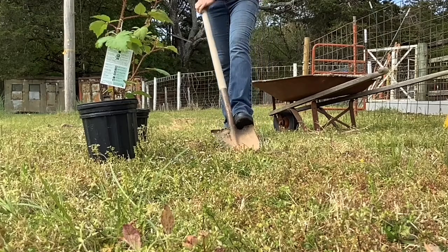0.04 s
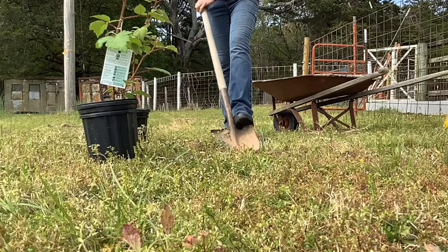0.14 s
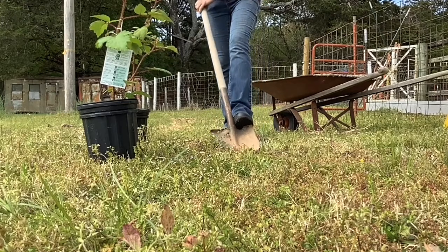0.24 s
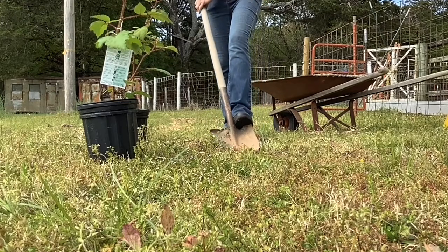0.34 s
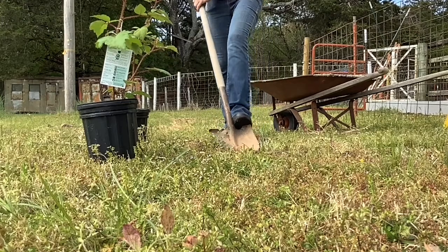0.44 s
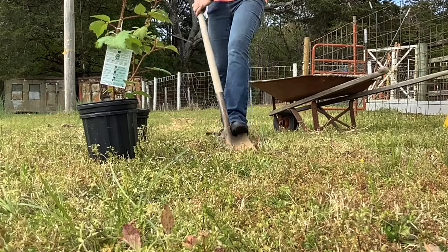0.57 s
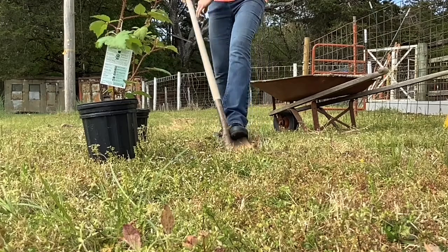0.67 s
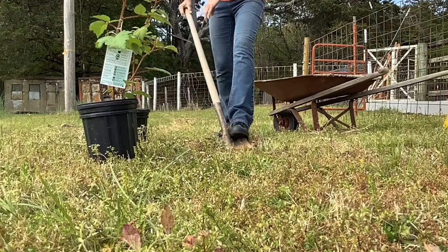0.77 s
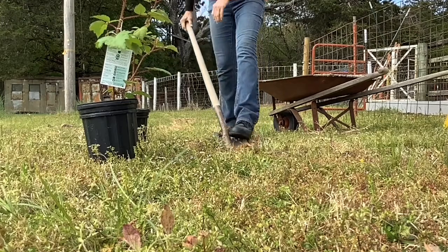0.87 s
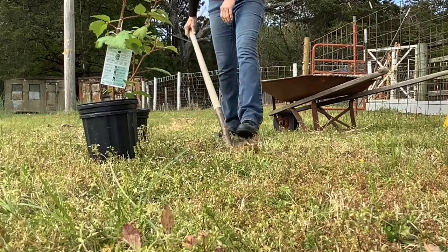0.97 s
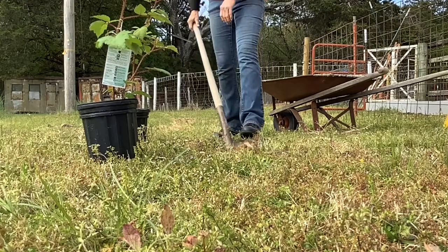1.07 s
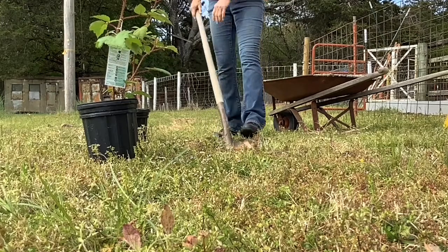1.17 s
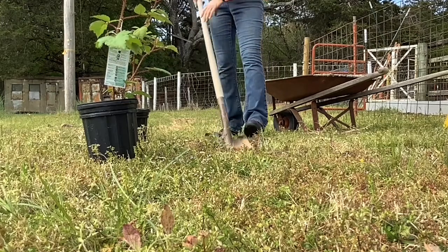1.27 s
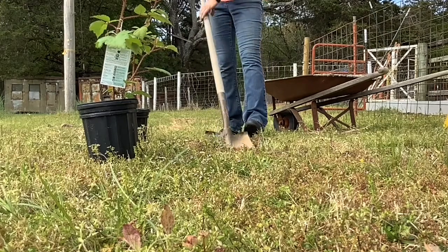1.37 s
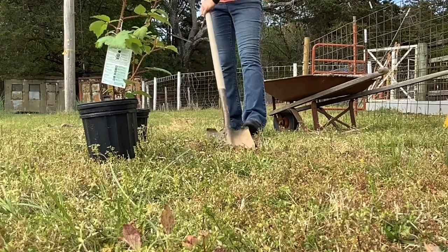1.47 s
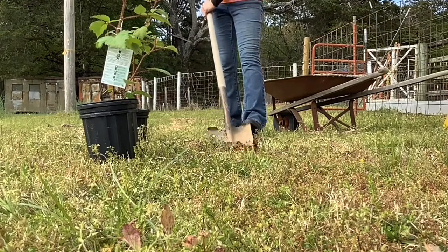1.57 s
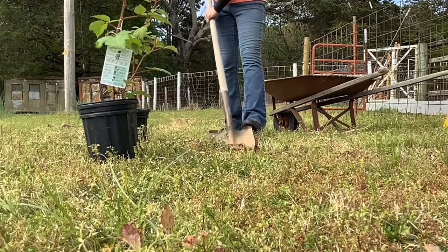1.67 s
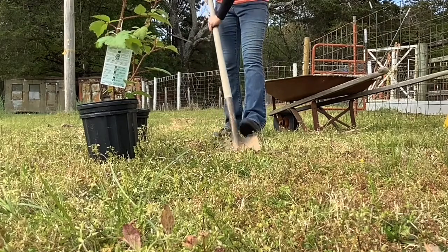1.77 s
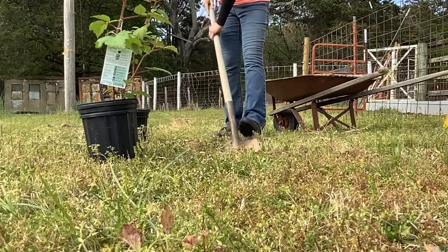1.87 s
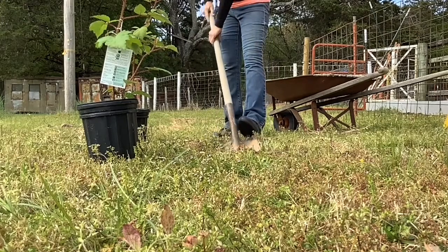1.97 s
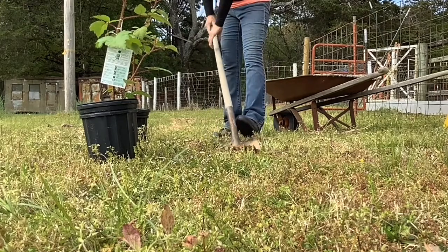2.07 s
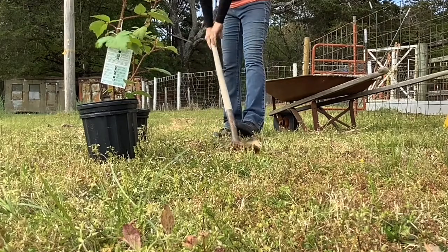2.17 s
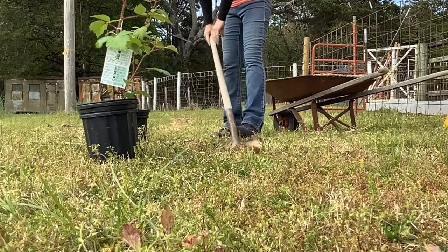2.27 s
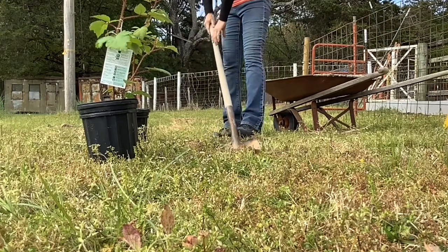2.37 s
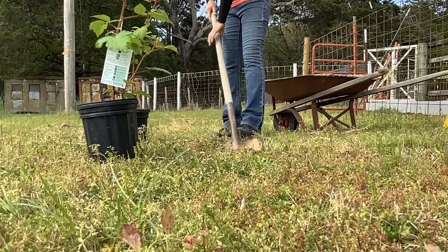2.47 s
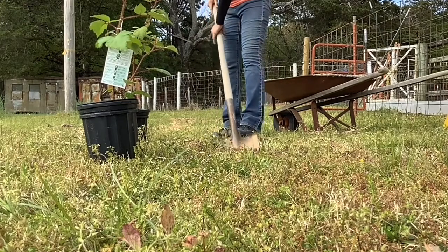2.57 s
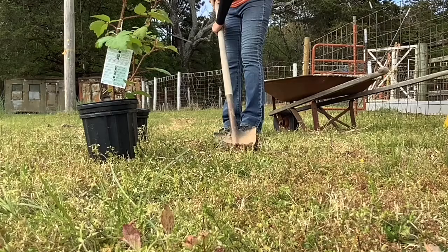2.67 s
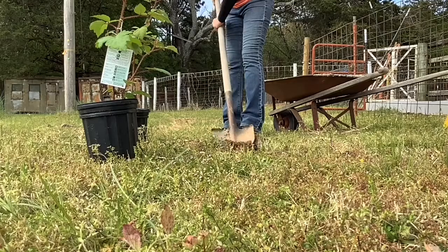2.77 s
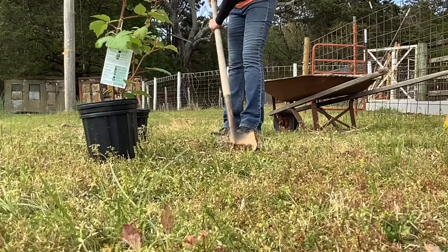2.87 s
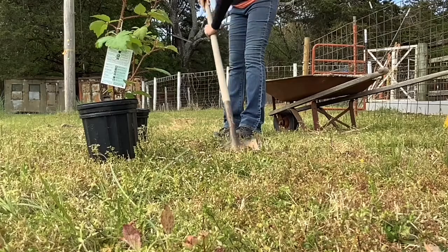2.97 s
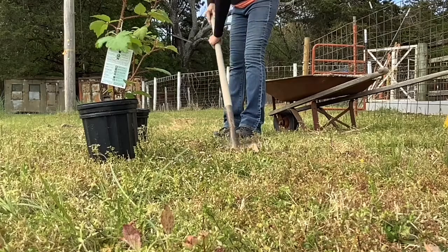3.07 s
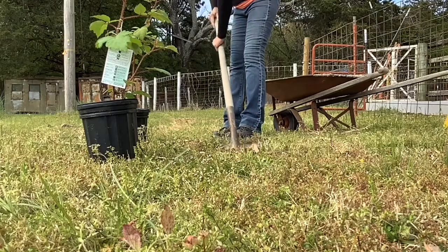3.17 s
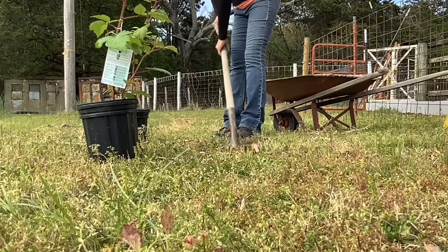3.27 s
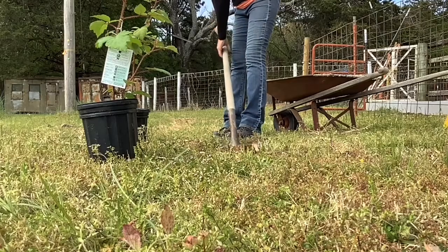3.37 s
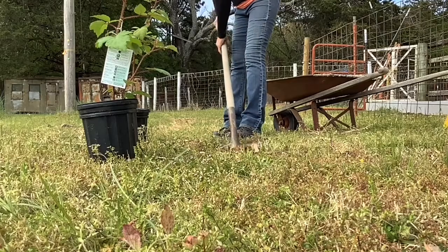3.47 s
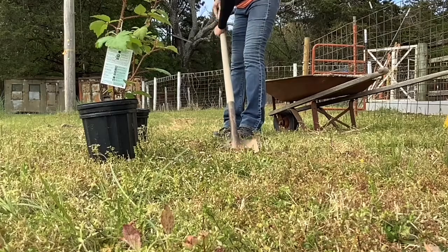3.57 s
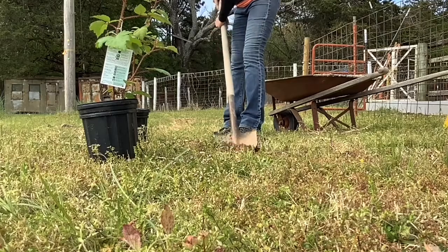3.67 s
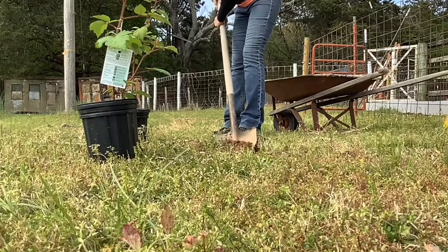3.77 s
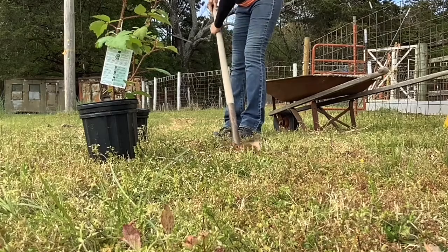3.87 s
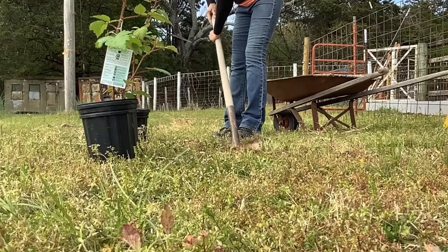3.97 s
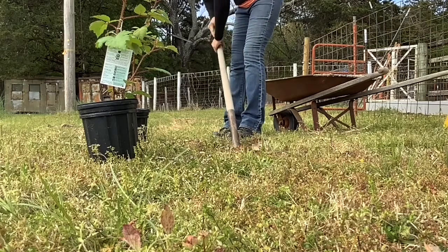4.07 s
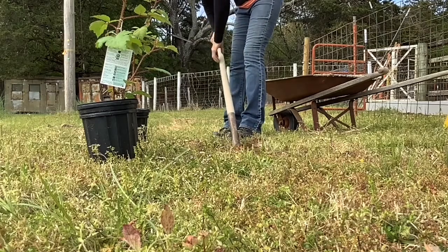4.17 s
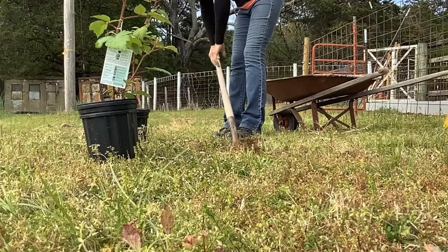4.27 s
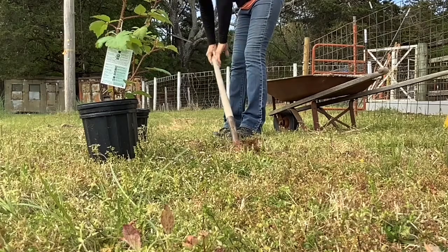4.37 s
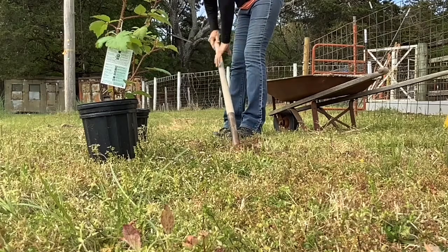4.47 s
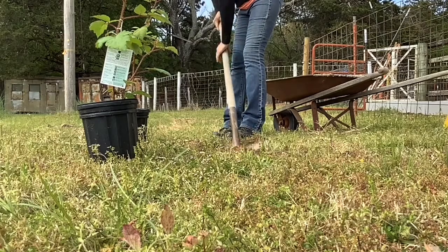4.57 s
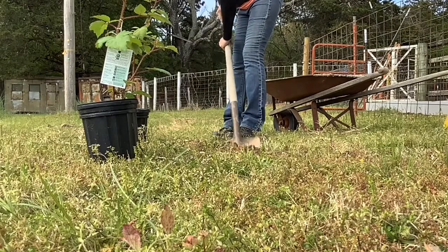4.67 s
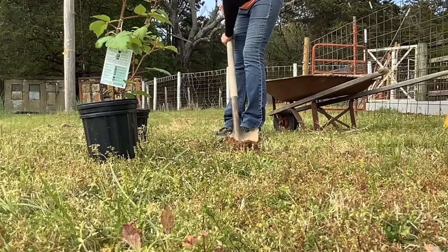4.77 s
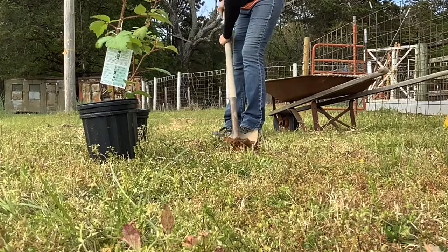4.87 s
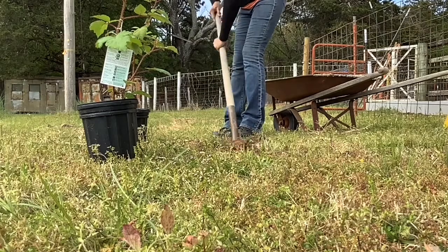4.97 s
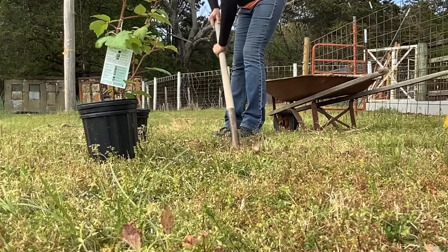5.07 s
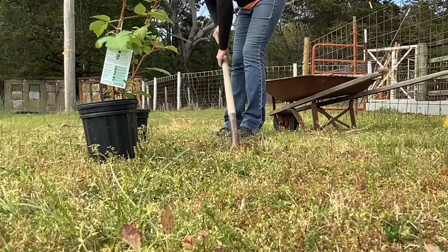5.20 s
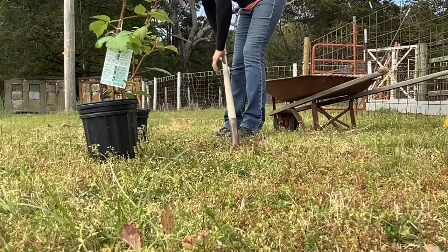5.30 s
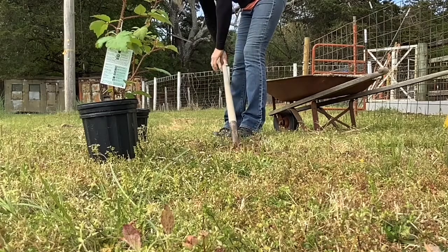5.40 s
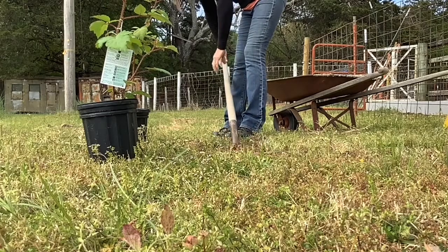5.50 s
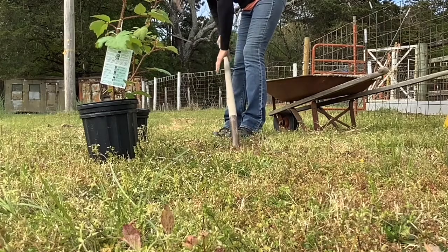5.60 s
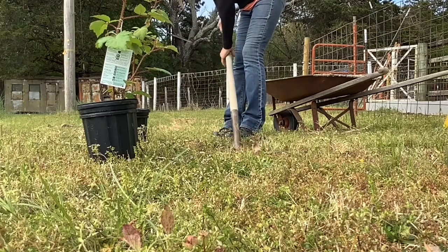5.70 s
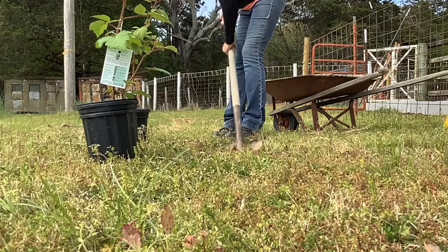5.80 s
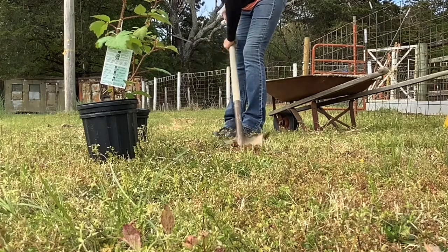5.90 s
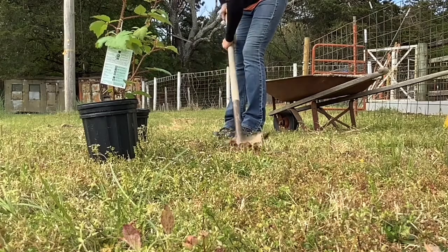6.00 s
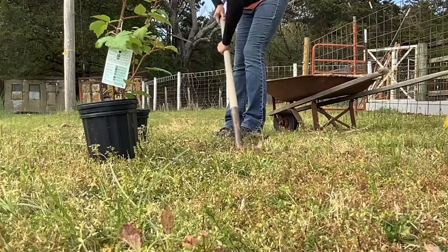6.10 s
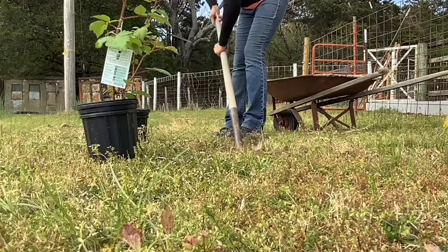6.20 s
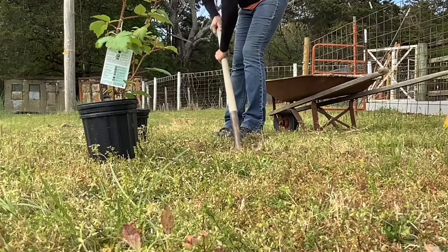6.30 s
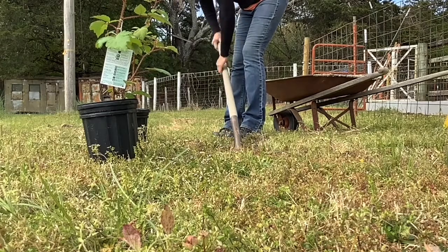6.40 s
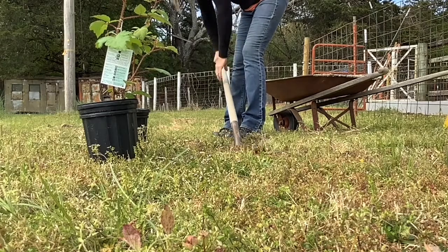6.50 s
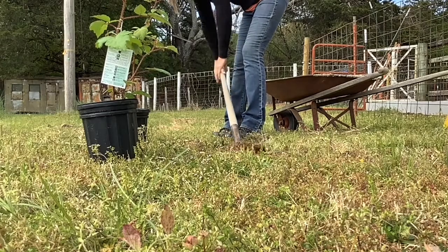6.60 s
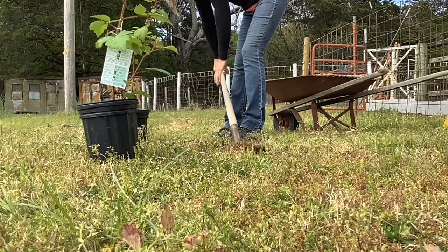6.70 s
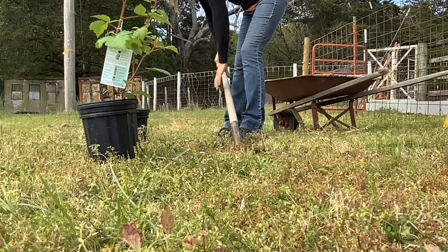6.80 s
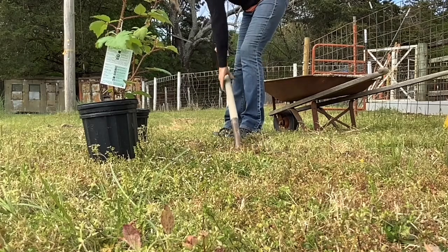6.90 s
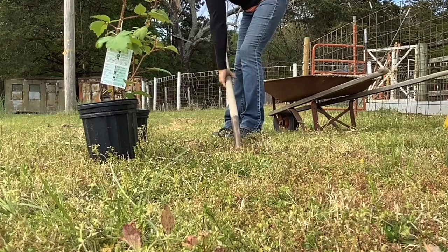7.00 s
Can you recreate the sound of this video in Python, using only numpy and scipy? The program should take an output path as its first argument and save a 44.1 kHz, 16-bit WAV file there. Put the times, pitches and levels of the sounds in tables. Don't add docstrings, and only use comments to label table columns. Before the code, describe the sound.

Close at ground level in an open yard, a shovel is driven into hard clay about once a second. A light, scratchy push comes first, then hard gritty clanks with low soil thuds, grass hiss and flying chips. Soft scrapes and small knocks fill the gaps. Later stabs are a little weaker. Far behind lie low traffic rumble, a droning engine, faint insects and one weak bird whistle.

```python
import sys
import numpy as np
from scipy import signal
from scipy.fft import rfft, irfft
from scipy.io import wavfile
from scipy.ndimage import map_coordinates

SR = 44100
rng = np.random.default_rng(int(sys.argv[2]) if len(sys.argv) > 2 else 0)


def waveform_to_disk(signal):
    frames = np.transpose(np.atleast_2d(signal))
    scaled = np.clip(frames, -1, 1) * 32767
    samples = np.round(scaled).astype(np.int16)
    wavfile.write(sys.argv[1], SR, samples)


def nominal_scale(level):
    x = np.asarray(level, float) / 20
    return 10 ** x


N = 310905
T = np.arange(N) / SR

# mode_hz, width_hz, level_db
UPPER_MODES = [(835, 240, -0.5), (1002, 170, 3), (1237, 200, 2), (1776, 160, 3), (2242, 100, -7.5),
               (2540, 120, -8.5), (3130, 330, -24), (4000, 970, -27)]


def rms_one(x):
    return x / np.sqrt(np.mean(x ** 2) + 1e-30)


def in_time(rows):
    s, *columns = np.transpose(rows)
    return [np.interp(T, s, c, -200, -200) for c in columns]


def butter(x, hz, kind, order=2):
    return signal.sosfilt(signal.butter(order, hz, kind, fs=SR, output="sos"), x)


def resonate(x, hz, width_hz):
    r = np.exp(-np.pi * width_hz / SR)
    top = [(1 - r * r) / 2, 0, (r * r - 1) / 2]
    return signal.lfilter(top, [1, -2 * r * np.cos(2 * np.pi * hz / SR), r * r], x)


def body(x, modes, grip=None):
    grip = np.ones(len(modes)) if grip is None else grip
    out = 0
    for k, (hz, width_hz, db) in enumerate(modes):
        out = out + (-1) ** k * nominal_scale(db) * resonate(x * grip[k], hz, width_hz)
    return out


def drift(rate_hz):
    knots = rng.standard_normal(int(N / SR * rate_hz) + 3)
    coarse = map_coordinates(knots, [T[::16] * rate_hz], order=3)
    return np.interp(T, T[::16], coarse)


def coloured(spectrum, white):
    hz, db = np.transpose(spectrum)
    bins_hz = np.maximum(np.arange(N // 2 + 1) * SR / N, 1)
    gain = nominal_scale(np.interp(np.log(bins_hz), np.log(hz), db))
    return rms_one(irfft(rfft(white) * gain, N))


def narrow(hz, width_hz):
    once = resonate(rng.standard_normal(N), hz, width_hz)
    return rms_one(resonate(once, hz, width_hz))


def grit(per_s, spread_db):
    sizes = nominal_scale(spread_db * np.minimum(rng.exponential(1, N), 4)) * rng.choice([-1, 1], N)
    return rms_one(sizes * (rng.random(N) < per_s / SR)) + 1e-9


def burst(rows, fall=0.6):
    power = np.zeros(N + SR)
    ms = 1000 * np.arange(-SR // 50, SR // 50) / SR
    for s, db, hz, length_ms, *_ in rows:
        i = round(s * SR) - SR // 50
        half_ms = length_ms * np.where(ms > 0, fall, 1 - fall)
        power[i:i + len(ms)] += (nominal_scale(db) * 2 ** -(ms / half_ms) ** 2) ** 2
    power = power[:N]

    def since_silence(v):
        return v - np.maximum.accumulate(v * (power == 0))

    s, hz = np.transpose(sorted((row[0], row[2]) for row in rows))
    phase = 2 * np.pi * np.cumsum(np.interp(T, s, hz)) / SR
    return np.sqrt(power), since_silence(phase), since_silence(T)


def pings(rows):
    out = np.zeros(N)
    ms = 1000 * np.arange(-SR // 25, SR // 25) / SR
    for s, db, hz, length_ms in rows:
        i = round(s * SR) - SR // 25
        swell = nominal_scale(db) * 2 ** -(2 * ms / length_ms) ** 2
        out[i:i + len(ms)] += swell * np.sin(2 * np.pi * hz * ms / 1000)
    return out


def open_air():
    # band_hz, density_db_per_hz
    air_spectrum = [(18, -34), (30, -18.5), (64, 5), (92, 6), (160, -10.5), (284, -16), (505, -11),
                    (606, -21.5), (921, -42.5), (3320, -40), (4310, -37), (5170, -40), (15500, -42)]
    return nominal_scale(-62.5 + 1.0 * drift(4.3)) * coloured(air_spectrum, rng.standard_normal(N))


def traffic():
    # time_s, level_db
    rumble_level = [(0, -64.5), (.3, -59), (.7, -57), (1.08, -64), (1.4, -68), (1.55, -57), (1.8, -49),
                    (2.04, -66), (2.3, -62.5), (2.77, -61), (4.16, -60.5), (4.55, -57), (5.0, -57.5),
                    (5.25, -59.5), (6.87, -59.5), (7.05, -60.5)]
    rumble = rms_one(butter(butter(rng.standard_normal(N), 52, "high", order=4), 130, "low"))
    return rumble * nominal_scale(in_time(rumble_level)[0] - 2.5 + 2.0 * drift(6))


def wavering_line(hz, db):
    level = np.sqrt(2) * nominal_scale(db + 2.0 * drift(12))
    return level * np.sin(2 * np.pi * np.cumsum(hz * (1 + 0.012 * drift(8))) / SR)


def engines():
    # time_s, main_line_db, speed relative to cruising
    approach = [(0, -71, 1.1), (1, -78.5, 1.12), (2.2, -72, 1.1), (2.7, -60, 0.94), (3.15, -56.5, 1.035),
                (3.7, -64.5, 1.07), (4.4, -56.5, 1.01), (5, -63, .99), (5.25, -51.5, 0.98),
                (6.2, -52, 1.01), (7.05, -51, 0.99)]
    # line_hz, level_db at middle distance, swell_share
    engine_lines = [(56.5, -70.5, .4), (90.4, -62, 1), (177.3, -74, 0.59)]
    # time_s, level_db
    motor_level = [(0, -68), (1.45, -75.5), (1.6, -61.5), (1.85, -73), (2.25, -78), (2.35, -65),
                   (2.9, -58.5), (3.2, -71.5), (4.4, -76), (5, -67), (6.2, -59.5), (7.05, -64)]
    main_db, speed = in_time(approach)
    middle_db = -60
    out = wavering_line(143, in_time(motor_level)[0])
    for hz, db, share in engine_lines:
        out = out + wavering_line(hz * speed, db + share * (main_db - middle_db))
    return out


def insects():
    # centre_hz, width_hz, level_db
    insect_bands = [(4290, 330, -92), (4620, 420, -95.5), (8560, 1100, -96.5)]
    return sum(nominal_scale(db + 1.4 * drift(2.2)) * narrow(hz, width_hz) for hz, width_hz, db in insect_bands)


def bird():
    # time_s, pitch_hz, level_db
    whistle = [(4.28, 3940, -92.5), (4.297, 3920, -81), (4.345, 3680, -78), (4.385, 4010, -82.5),
               (4.455, 3950, -76.5), (4.475, 4110, -87), (4.515, 4170, -74), (4.6, 4250, -78),
               (4.67, 4260, -82), (4.72, 4280, -95)]
    # peak_s, peak_db, pitch_hz, length_ms
    cheeps = [
        (1.559, -81, 5840, 14),
        (4.352, -86, 5350, 12),
        (4.5, -83, 5480, 14),
        (4.52, -74, 3640, 55),
        (4.525, -82, 5500, 14),
    ]
    hz, db = in_time(whistle)
    blur = rms_one(butter(rng.standard_normal(N), 140, "low")) * nominal_scale(1.2 * drift(28))
    return blur * (nominal_scale(db) * np.sin(2 * np.pi * np.cumsum(hz) / SR) + pings(cheeps))


def background():
    return open_air() + traffic() + engines() + insects() + bird()


def thuds():
    # arrival_s, peak_db, centre_hz
    ground_waves = [(0.552, -54, 200), (1.527, -43, 152), (1.612, -55, 169.6), (1.66, -54.5, 130),
                    (1.769, -35, 136), (1.82, -39, 74), (1.889, -35.5, 255), (2.948, -39.5, 134.4),
                    (2.988, -41, 71.9), (3.892, -30, 180), (3.913, -41, 72.4), (4.99, -39, 172),
                    (6.152, -35, 157)]
    out = np.zeros(N + SR)
    for s, db, hz in ground_waves:
        i = round(s * SR)
        cycles = T[:SR // 4] * hz
        wave = np.sin(2 * np.pi * cycles / (1 + 0.14 * cycles))
        out[i:i + len(cycles)] += nominal_scale(db + 11.5) * cycles * np.exp(-cycles / 0.59) * wave
    return out[:N]


def ticks():
    # start_s, level_db, centre_hz, length_s
    stems = [(.41, -67.5, 11500, .012), (0.505, -59, 13000, 0.045), (0.602, -63, 12000, 0.035),
             (0.681, -62.5, 12500, 0.027), (1.755, -52, 12000, .008), (1.885, -62, 3000, 0.0046),
             (1.886, -64, 11500, .003), (2.921, -56, 12980, .012), (3.46, -72, 7150, 0.036),
             (3.857, -58, 13000, .01), (4.108, -73, 5960, 0.036), (5.215, -73, 6040, 0.018),
             (5.699, -65, 5500, .02), (5.715, -65, 9000, .02), (5.902, -72, 12000, .003),
             (6.253, -71, 9000, 0.0024)]
    # peak_s, peak_db, centre_hz
    chips = [(0.5249, -46, 13420), (0.5357, -51.0, 13320), (0.545, -50, 12980), (0.5495, -44, 13770),
             (0.556, -54, 5230), (1.7378, -61, 4220), (1.7464, -43, 13180), (1.751, -62, 4290),
             (1.7596, -38.5, 4200), (1.7657, -44.5, 4570), (2.911, -53.5, 4590), (2.9177, -61, 5320),
             (2.9256, -45, 12770), (2.9313, -37.5, 4640), (2.9393, -52, 4370), (3.8504, -52.5, 5420),
             (3.859, -47.5, 9500), (3.862, -47, 4770), (3.8685, -45, 4740), (3.8725, -49, 4620),
             (4.9385, -39, 4200), (4.958, -37.5, 3700), (4.9662, -40, 5960), (6.0526, -50, 4520),
             (6.0652, -54, 6150), (6.0779, -48, 9820), (6.09, -45, 12270), (6.1015, -54, 4750),
             (6.121, -60, 6220), (6.1254, -50, 4590)]
    chip_s = 0.002
    rows = stems + [(s - chip_s / 2, db + 2.0, hz, chip_s) for s, db, hz in chips]
    out = np.zeros(N + SR)
    for s, db, hz, length_s in rows:
        i = round(s * SR)
        u = T[:SR // 4] / length_s
        noise = resonate(rng.standard_normal(SR // 4), hz, hz * 0.48)
        noise = rms_one(resonate(noise, hz, hz * 0.66))
        out[i:i + len(u)] += nominal_scale(db + 7.5) * u * np.exp(-2 * u) * noise
    return out[:N]


def grass():
    # band_hz, density_db_per_hz
    hiss_spectrum = [(1650, -28.5), (2800, -4.5), (3250, -3.5), (3500, -1.5), (3840, -10), (4270, 1),
                     (4930, -5.5), (5330, -4.5), (6290, -6.5), (6800, -12.5), (8200, -12), (10100, -6),
                     (11600, -13.5), (12700, -11.5), (15500, -8.5)]
    # mode_hz, width_hz, level_db
    edge_modes = [(4590, 120, -2.5), (6290, 100, -3), (7900, 150, -8.5), (10000, 370, -2), (12800, 220, -6)]
    grains = grit(per_s=11000, spread_db=1.5) + nominal_scale(-6.5) * grit(per_s=500, spread_db=7.0)
    noise = coloured(hiss_spectrum, grains) * nominal_scale(0.73 * drift(110))
    edges_hz = np.geomspace(1500, 19500, 22)
    patches = 0
    for low_hz, high_hz in zip(edges_hz, edges_hz[1:]):
        patches = patches + nominal_scale(2.2 * drift(40)) * butter(noise, [low_hz, high_hz], "band")
    grip = [nominal_scale(2.0 * drift(28)) for mode in edge_modes]
    return rms_one(patches + nominal_scale(0.5) * body(noise, edge_modes, grip))


def effort():
    # contact_s, travel_s, force_db, edge bite relative_db, grass relative_db
    stabs = [
        (0.414, 0.076, -48, -12, -24.5),
        (0.489, 0.059, -32.5, -15.5, -32),
        (1.7, 0.043, -46, -8, -9),
        (1.753, 0.006, -22.5, -12, -23),
        (1.885, 0.0032, -42, -15.5, -46),
        (2.909, 0.029, -18.5, -16, -30),
        (3.821, 0.039, -35.5, -11.5, -21.5),
        (3.857, 0.018, -24, -23, -27.5),
        (4.935, 0.035, -27.5, -16, -22.5),
        (6.054, 0.072, -31, -17, -21.5),
    ]
    # peak_s, length_s, force_db, edge bite relative_db, grass relative_db
    scrapes = [(.002, 0.017, -46, -16.5, -19.5), (0.048, 0.23, -60.5, -10.5, -14),
               (0.538, 0.091, -41.5, -5, -11), (0.62, 0.2, -49, -6, -22), (0.684, 0.14, -49, -5.5, -28),
               (0.725, 0.051, -52.5, -2, -38), (1.422, 0.059, -51, -10.5, -11),
               (1.454, 0.094, -58, -4, -2.5), (1.9, 0.13, -50.5, -13, -30), (2.899, 0.14, -59, -5.5, -9.5),
               (3.004, 0.31, -53, -16.5, -24), (3.805, 0.12, -61, -7.5, -15),
               (4.139, 0.065, -51.5, -14, -20.5), (4.919, 0.096, -56, -4, -12),
               (4.998, 0.096, -52, -11, -17), (5.738, 0.11, -54.5, -8, -7.5),
               (5.776, 0.07, -45, -10.5, -11.5), (6.091, 0.098, -51.5, -2, 0),
               (6.136, 0.091, -49, -11.5, -31)]
    # peak_s, length_s, force_db, brightness_db
    shifts = [(0.354, 0.16, -70, -11), (0.847, 1, -68, 6), (1.072, 0.064, -60, 6.5),
              (1.347, 0.17, -67.5, 12), (1.517, 0.11, -65, 7.5), (1.697, 0.078, -59, 8.5),
              (2.005, 0.3, -73, 12), (2.167, 0.42, -59, -1.5), (2.544, 0.28, -60.5, 2),
              (2.713, 0.21, -65, 4.5), (3.249, 0.13, -53, 5), (3.552, 0.26, -59, 4), (3.95, 0.34, -55, 3),
              (4.056, 0.31, -57, 3), (4.22, 0.17, -60, -3), (4.489, 0.14, -62, 10.5),
              (4.581, 0.18, -55, 6.5), (5.091, 0.2, -61, -3), (5.21, 0.36, -57.5, 1.5),
              (5.352, 0.16, -64, 7), (5.629, 0.21, -68, -9.5), (5.854, .15, -62, 5),
              (5.913, 0.16, -54.5, 2), (6.19, 0.39, -54, -2), (6.407, 0.14, -57, 2.5),
              (6.55, 0.24, -77, -4), (6.948, 0.28, -73, -4), (7.048, .02, -64, 6)]
    # low_db, upper_db, hiss_db
    climb_db = (15.5, 4, 0)
    # low_db_per_s, upper_db_per_s, hiss_db_per_s
    entry_db_per_s = (4000, 9000, 3600)
    # low_s, upper_s, hiss_s
    hold_s = (0.0023, 0.0021, 0.0061)
    # low_db_per_s, upper_db_per_s, hiss_db_per_s
    stop_db_per_s = (899.5, 1098.5, 1299.5)
    # low_db, upper_db, hiss_db
    rest_db = (-83, -102, -102)
    swell_db, rise_share = (13.5, 14.5, 22), 0.4

    def column(v):
        return np.array(v)[:, None]

    t = T[::16]
    db = column(rest_db) + 0 * t
    for s, travel_s, force_db, bite_db, grass_db in stabs:
        climb = column(climb_db) * np.minimum((t - s) / travel_s - 1, 0)
        stop = column(stop_db_per_s) * (s + travel_s + column(hold_s) - t)
        entry = column(entry_db_per_s) * np.minimum(t - s, 0)
        peak_db = force_db + column([0, bite_db, grass_db])
        db = np.maximum(db, peak_db + np.minimum(climb, stop) + entry)
    drags = scrapes + [(s, length_s, force_db, -18 + bright_db, -28.5 + bright_db)
                       for s, length_s, force_db, bright_db in shifts]
    for s, length_s, force_db, bite_db, grass_db in drags:
        away = np.maximum((s - t) / rise_share, (t - s) / (1 - rise_share)) / length_s
        db = np.maximum(db, force_db + column([0, bite_db, grass_db]) - column(swell_db) * away)
    return [np.interp(T, t, nominal_scale(row + trim_db)) for row, trim_db in zip(db, (-3.5, -1.5, -0.5))]


def grinding():
    # mode_hz, width_hz, level_db
    low_modes = [(378, 150, -7.5), (524.3, 53, -2), (593, 72, -2)]
    low, upper, hiss = effort()
    low = np.minimum(low, nominal_scale(-32.5))
    low = np.roll(low, -round(0.0041 * SR))
    upper = np.minimum(upper, nominal_scale(-40))
    grains, sand = grit(per_s=760, spread_db=3.0), grit(per_s=2200, spread_db=3.5)
    grip = [nominal_scale(1.8 * drift(22)) for mode in UPPER_MODES]

    def dull(x):
        return butter(body(x, low_modes), 670, "low", order=6)

    def bright(x):
        return butter(body(x, UPPER_MODES, grip), 720, "high", order=4)

    low_ring = dull(low * grains) / np.std(dull(grains))
    upper_ring = bright(upper * sand) / np.std(bright(sand))
    return low_ring + upper_ring + hiss * grass()


def jolts():
    # peak_s, peak_db, low ring pitch_hz, length_ms
    hits = [(0.4998, -37.5, 572.6, 7.5), (0.504, -35, 601, 7.3), (0.5189, -44, 515, 3.7),
            (0.53, -37, 555, 4), (0.5348, -35, 519, 4), (0.5468, -37, 534, 4), (0.5525, -27.5, 533, 2.2),
            (0.5576, -34, 560, 3.3), (0.5641, -41, 450, 2.6), (0.5733, -35, 607, 6), (0.686, -40, 500, 4.6),
            (1.7228, -36, 561.7, 7.1), (1.7555, -20.5, 553.2, 10), (1.7623, -10, 539.5, 6.5),
            (1.7705, -10.5, 469, 4.4), (1.779, -29, 553, 2.3), (1.8899, -31, 478, 3.5),
            (2.9147, -32, 510, 4.8), (2.9229, -32, 553, 4.5), (2.9322, -14, 556, 8.8),
            (2.9443, -11.5, 490, 4), (2.9488, -16.5, 549, 4.8), (2.9582, -23, 531, 2),
            (3.8305, -40, 582, 6.5), (3.8493, -36, 523, 6.3), (3.8563, -36, 444.6, 2.9),
            (3.8642, -15, 479, 2.7), (3.8725, -44, 512, 2.5), (3.8771, -20.5, 526, 5.8),
            (3.8826, -19, 425, 1.5), (3.8898, -23, 580, 1.5), (3.8958, -42, 438.8, 2.6),
            (4.9406, -33.0, 542, 4.3), (4.9472, -35.5, 408, 2.2), (4.9514, -24, 501, 2.2),
            (4.9597, -29, 369, 3), (4.965, -34, 455, 7.8), (4.9697, -33, 534, 5.5), (4.9739, -43, 495, 2.9),
            (4.9859, -27.5, 607, 8.4), (5.7763, -43.5, 490, 5.8), (6.0755, -41, 520.8, 5.3),
            (6.0918, -35, 451, 4.6), (6.0964, -44, 455, 4.6), (6.1113, -41, 482, 2.3),
            (6.1176, -33, 418, 1.3), (6.1225, -20.5, 519, 4.9), (6.1311, -28, 602, 7.1),
            (6.1381, -31.5, 520, 8.7), (6.1448, -39, 616, 8.8)]
    # peak_s, peak_db, pitch_hz, length_ms, crack relative_db
    knocks = [(1.3968, -53, 581, 7.5, -2), (2.1202, -50, 487, 8.1, -9), (3.0339, -38.5, 566, 6.6, -34),
              (3.078, -44.5, 488, 5, -10), (3.9547, -44, 496, 3.3, -28), (4.1346, -49, 573, 6.5, -20),
              (4.1484, -42, 503, 3.8, -9), (4.2216, -50, 505, 3.5, -12), (4.5987, -49, 562, 7.2, 0.5),
              (5.085, -47, 500, 3.2, -13), (5.1619, -45, 496, 3.8, -25), (5.1776, -45, 460, 3.55, -25),
              (5.2087, -44.5, 459, 3.4, -7), (5.2412, -43, 460, 4.7, -29), (5.907, -55.5, 532, 3, 2),
              (6.19, -46.5, 568, 7.3, -11), (6.2827, -44, 510, 2.6, -13)]
    # peak_s, peak_db, pitch_hz, length_ms, crack
    # relative_db
    more_knocks = [(.419, -45.5, 563, 10, -17), (.443, -40.5, 596, 7, -17), (.456, -39.5, 610, 6.5, -8),
                   (.638, -42.5, 618.5, 8.6, -21), (0.6663, -41, 557, 6, -20), (.686, -43, 541, 5.2, -21),
                   (.718, -48, 558, 6.6, -13), (0.739, -44, 526, 8.4, -12), (1.7152, -38, 556, 4.3, -19),
                   (1.781, -32, 593, 4, -33.5), (3.8873, -23.5, 567, 3.5, -37), (5.755, -39.5, 519.2, 4.5, -15),
                   (5.765, -38, 466, 5, -17)]
    # mode_hz, relative_db
    side_rings = [(345, -13.5), (625, -10.5)]
    # peak_s, peak_db, pitch_hz, length_ms
    cracks = [(0.4816, -44, 1734, 3.1), (0.4973, -49, 1290, 2.6), (0.5022, -42, 1339, 2.7),
              (0.5147, -46, 1478, 1.3), (0.5201, -57, 1176, 1.4), (0.5257, -42, 1483, 2.9),
              (0.5333, -45, 1624, 1.4), (0.5383, -48, 1460, 1.8), (0.5432, -40, 1420, 2.5),
              (0.5498, -47, 1390, 1.7), (0.5568, -41, 1326, 3.9), (0.5634, -44, 1270, 1.3),
              (0.569, -41, 1103, 1.9), (0.606, -48, 1311, 3.3), (1.7501, -43, 1309, 2.6),
              (1.7592, -20.5, 1254, 3.2), (1.7648, -34, 1350, 2.5), (2.9114, -36.0, 1313, 3.9),
              (2.9164, -41, 1204, 1.6), (2.9296, -24, 1546, 1.9), (2.9451, -29, 1545, 1.4),
              (2.9526, -38.5, 1167, 2.4), (3.8228, -35.5, 1501, 2.42), (3.8282, -31.5, 1194, 2.4),
              (3.8407, -50, 1440, 1.9), (3.86, -27.5, 1624, 3.8), (3.8659, -22, 1333, 3.7),
              (3.8745, -37, 1050, 2.7), (3.8835, -38.5, 1050, 3.1), (4.939, -29.5, 2290, 2.5),
              (4.9448, -38, 1737, 3.1), (4.9498, -38, 1694, 2.2), (4.9603, -36, 1490, 1.8),
              (4.9649, -39, 1150, 2.9), (4.9711, -37, 1420, 2.6), (4.9762, -47, 1570, 1.7),
              (4.9815, -47, 1010, 2.6), (6.0629, -54, 1321, 1.72), (6.0677, -48, 1400, 2.76),
              (6.0729, -46.5, 1715, 5.2), (6.077, -49, 1386, 1.8), (6.0839, -47, 1450, 1.6),
              (6.0943, -46, 1736, 1.5), (6.1132, -55, 1072, 2.2), (6.1195, -42.5, 1266, 2.5),
              (6.1243, -47.0, 1190, 1.4), (6.1305, -50, 1100, 1.5), (6.1398, -43, 1160, 2.8)]
    # peak_s, peak_db, pitch_hz,
    # length_ms
    splits = [(1.453, -54, 2430, 3), (1.7012, -50, 1660, 2.6), (1.71, -49, 1475, 3.7),
              (1.7575, -33, 1800, 4.7), (1.7606, -35.5, 2536, 4), (1.8883, -44, 1278, 2.5),
              (2.9255, -31, 1626, 2.6), (2.93, -27.5, 2635, 2.92), (2.9325, -22.5, 930, 2.2),
              (2.9366, -30, 1710, 3), (2.941, -36.5, 1490, 3), (3.8325, -43, 1500, 4),
              (3.858, -40, 1537, 2.3), (3.8706, -34, 893, 3.7), (4.146, -56, 1754, 3.2),
              (4.598, -55, 1487, 2.8), (4.9385, -32, 1247, 2.4), (4.9575, -36.5, 2560, 3.3),
              (5.0835, -69, 1370, 1.8), (5.239, -61, 1484, 2.2), (5.905, -73, 1405, 2.9),
              (6.281, -52, 1395, 1.7)]
    crack_fall = 0.74

    swell, phase, age_s = burst(hits + knocks + more_knocks)
    side = sum(nominal_scale(db) * np.sin(2 * np.pi * hz * age_s) for hz, db in side_rings)
    ring = nominal_scale(-1.0) * swell * (np.sin(phase) + side)
    ring = np.roll(butter(ring, 740, "low", order=6), -76)

    snap, snap_phase, _ = burst([(s - 0.0004, *rest) for s, *rest in cracks], crack_fall)
    split, split_phase, _ = burst([(s - 0.0004, *rest) for s, *rest in splits], crack_fall)
    crack = snap * np.sin(snap_phase) + split * np.sin(split_phase)

    ahead = [(s - 0.0025, db + crack_db + 6.0, hz, 2.5) for s, db, hz, length_ms, crack_db in knocks + more_knocks]
    noise = rng.standard_normal(N)

    def rattle(gain):
        shaken = np.roll(gain, -30) * noise + 1e-18
        return butter(body(shaken, UPPER_MODES), 780, "high", order=4)

    return ring + nominal_scale(-2.5) * crack + rattle(nominal_scale(7.0) * snap + burst(ahead, crack_fall)[0])


def blade_pings():
    # peak_s, peak_db, pitch_hz, length_ms
    notes_sung = [
        (1.35, -76, 2540, 9),
        (1.42, -62, 2440, 9),
        (1.434, -69, 1740, 5.1),
        (2.542, -73.5, 2400, 10),
        (1.466, -70, 4540, 7),
        (3.245, -61.5, 1570, 11),
        (3.262, -60, 1510, 6.8),
        (3.55, -70, 1260, 22),
    ]
    return pings(notes_sung)


def ground(x):
    # centre_hz, width_hz
    notches = [(745, 97), (2030, 86), (3860, 150)]
    for hz, width_hz in notches:
        x = x - resonate(x, hz, width_hz)
    return x


def scene():
    shovel = ground(grinding() + jolts() + blade_pings())
    return (shovel + thuds() + ticks() + background())[None]


def band_limit(x):
    return signal.sosfilt(signal.butter(12, 15720, fs=SR, output="sos"), x)


def record(dry):
    top_cut = signal.cheby2(24, 60, 15830, fs=SR, output="sos")
    mix = signal.sosfilt(top_cut, butter(dry, 54, "high", order=5))
    return band_limit(mix)


dry = scene()
out = record(dry)
waveform_to_disk(out)
```